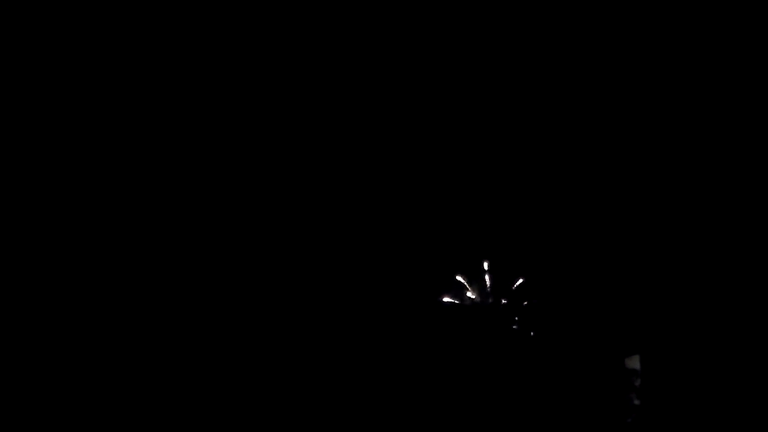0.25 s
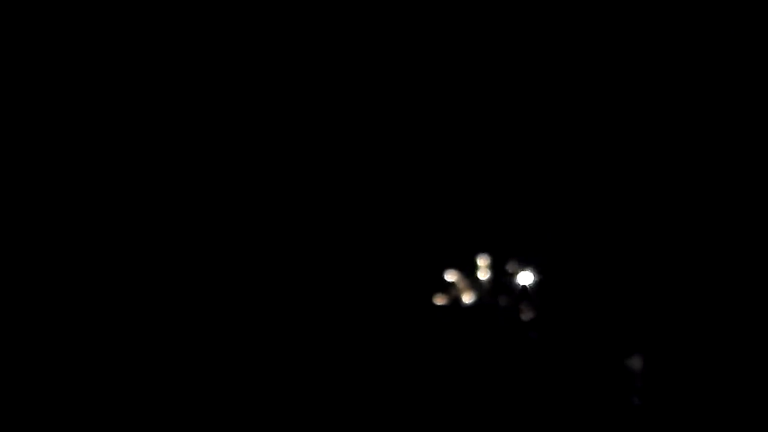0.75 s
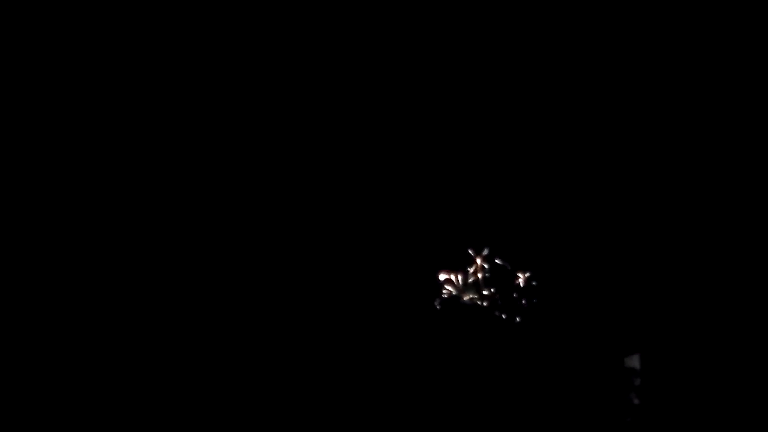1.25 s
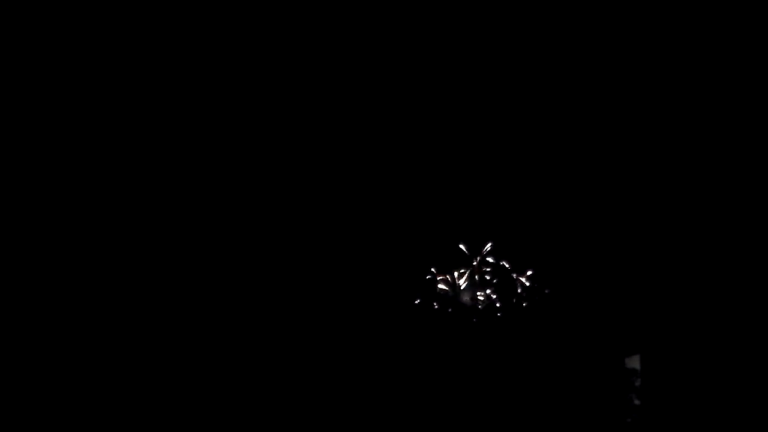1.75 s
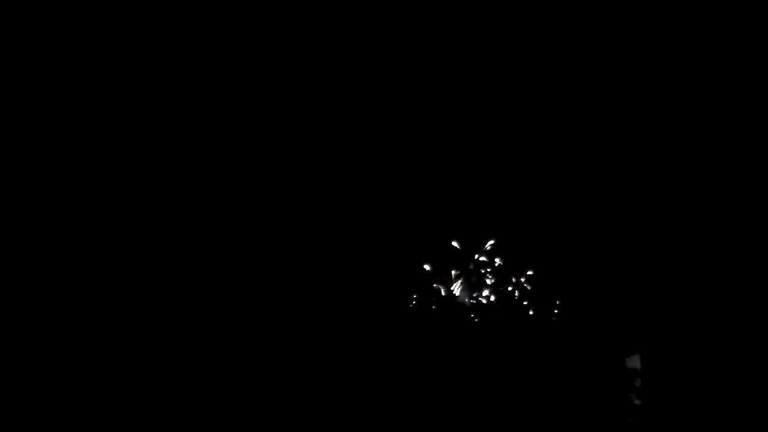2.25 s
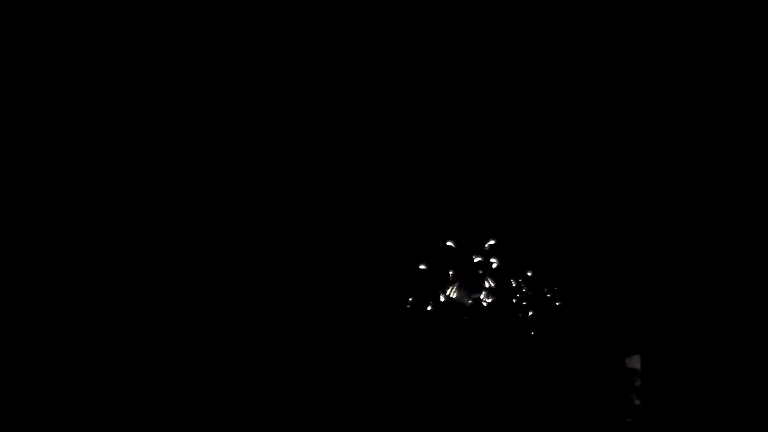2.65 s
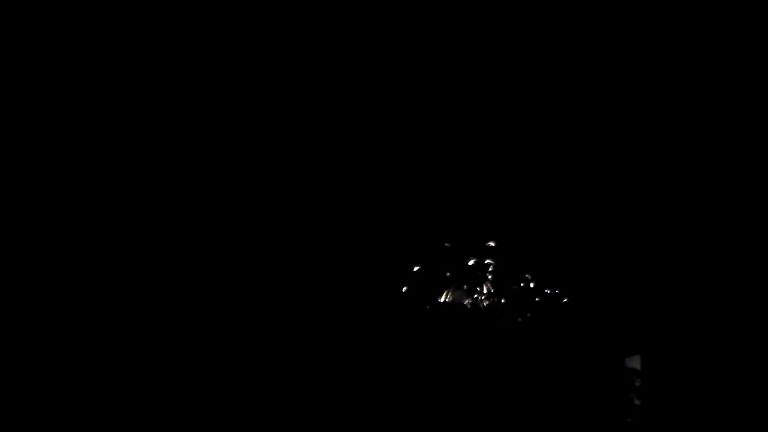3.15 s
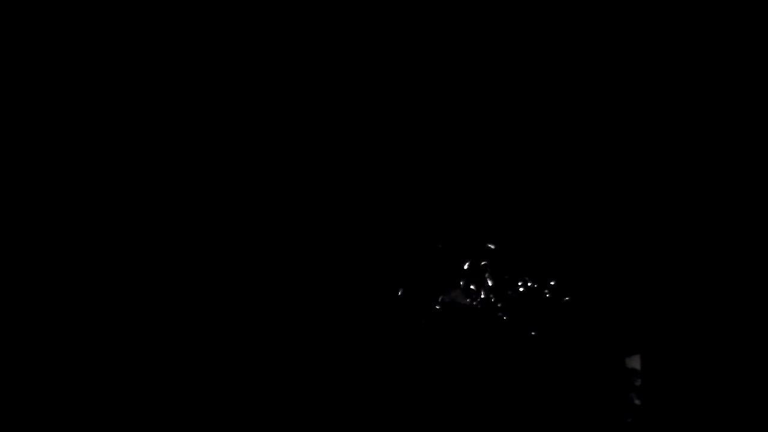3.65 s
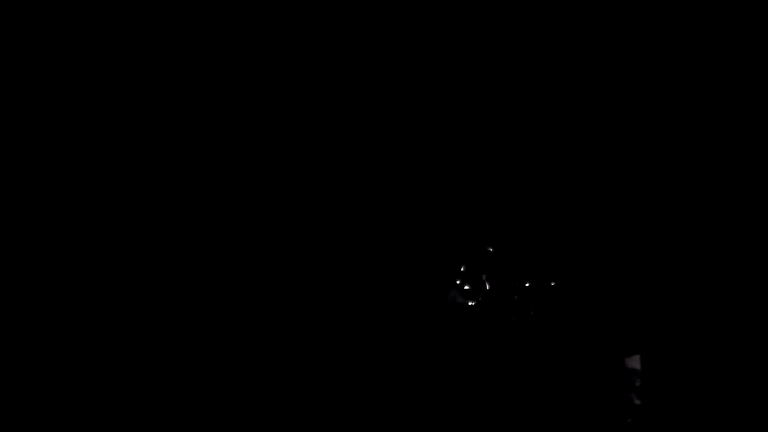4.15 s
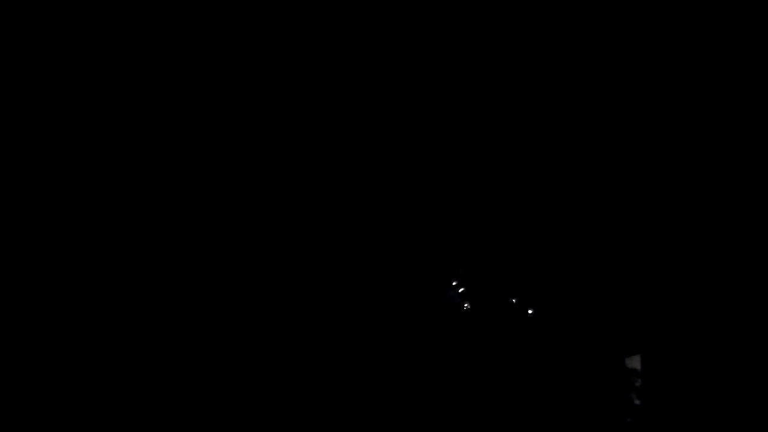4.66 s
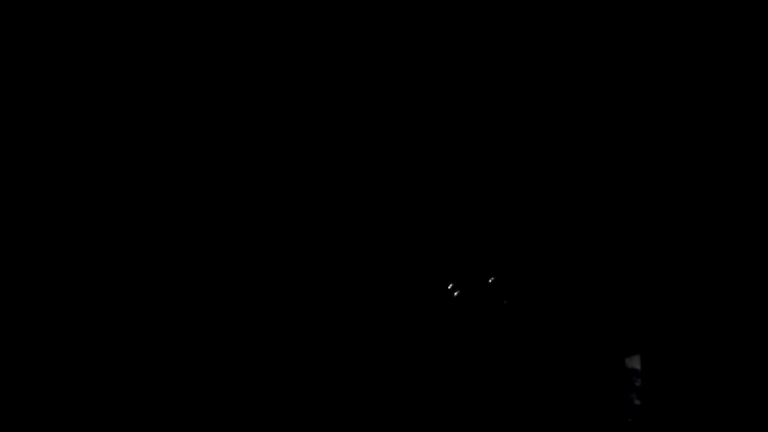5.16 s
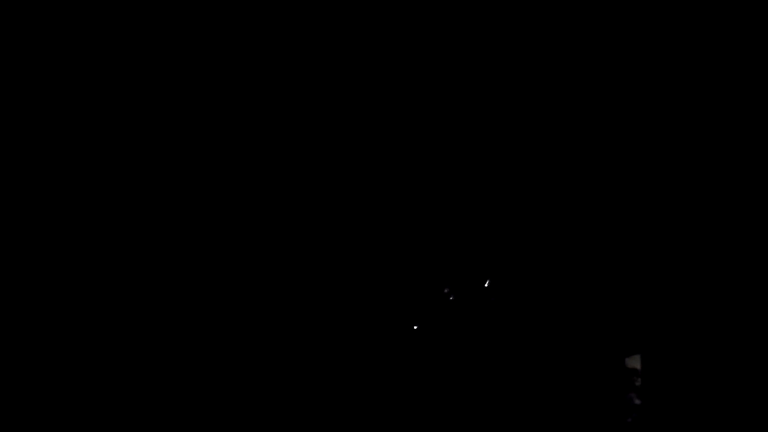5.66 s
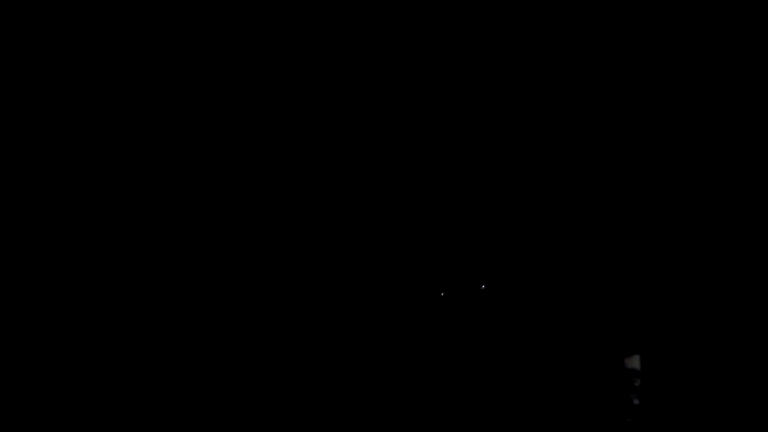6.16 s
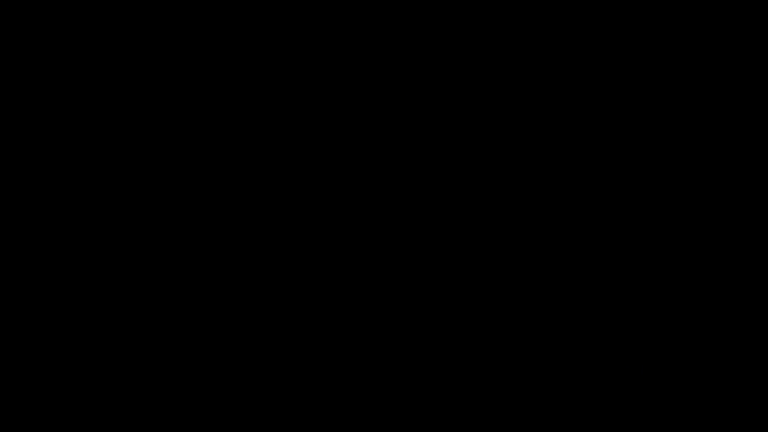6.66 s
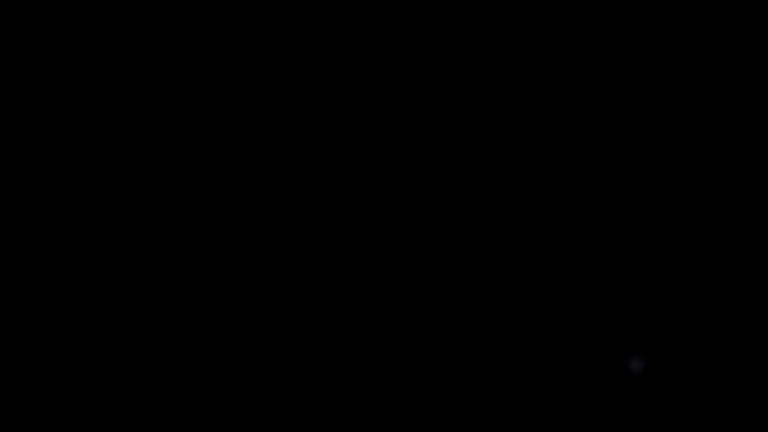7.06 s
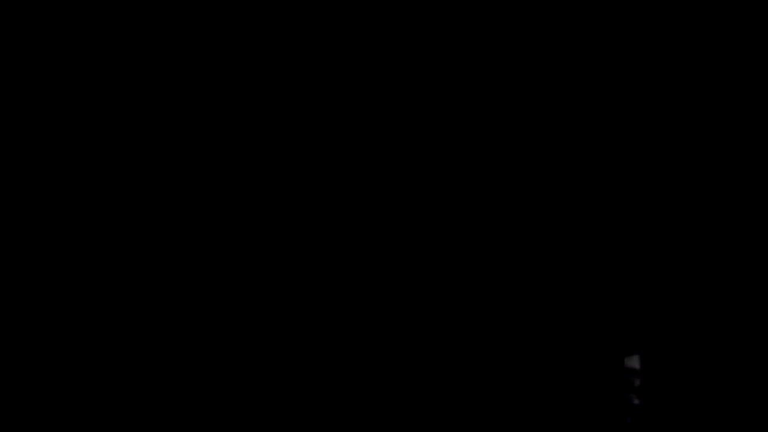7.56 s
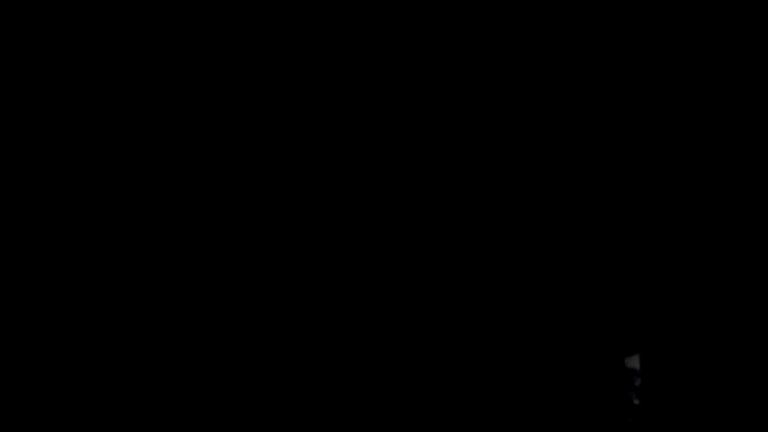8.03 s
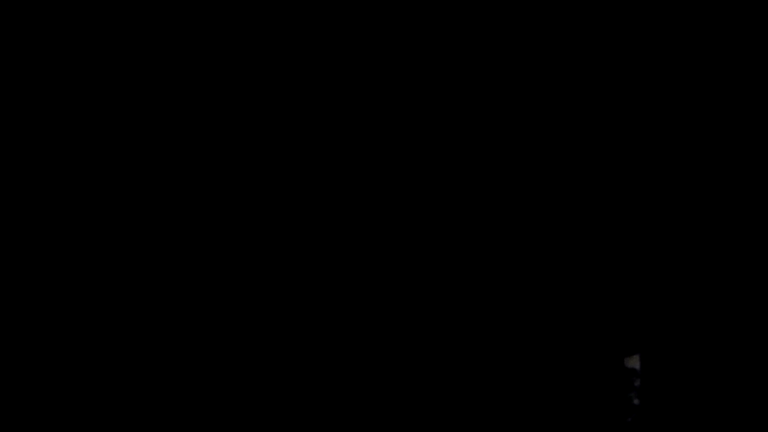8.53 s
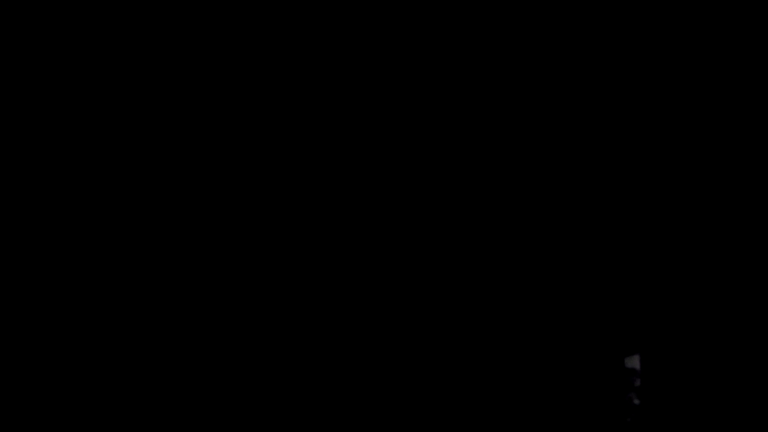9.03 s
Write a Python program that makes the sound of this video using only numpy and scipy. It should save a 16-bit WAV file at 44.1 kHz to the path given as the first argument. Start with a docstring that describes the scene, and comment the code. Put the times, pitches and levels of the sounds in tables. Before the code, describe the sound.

Whooshing rockets and a few sharp, echoing firework bangs give way to dense runs of hollow pops above rumble and faint sizzle.

```python
"""Fireworks heard from a yard: two rockets puff, whoosh up and bang, mortars thump, then a dense run of pops.
Every blast is one pressure pulse thrown back by nearby walls and scatter, with a tail from far houses.
Beneath lie the growing roar and the sizzle of burning effects: shaped noise that follows level curves.
A gain control ducks everything for about half a second after the loudest bangs."""
import sys
import numpy as np
from scipy import signal
from scipy.fft import rfft, irfft, next_fast_len
from scipy.io import wavfile
from scipy.ndimage import uniform_filter1d, minimum_filter1d, map_coordinates

SR = 44100
rng = np.random.default_rng(int(sys.argv[2]) if len(sys.argv) > 2 else 0)


def dump(signal):
    """Clip the signal to [-1, 1] and save it as 16-bit WAV at the path in sys.argv[1]."""
    limited = np.clip(np.atleast_2d(signal).T, -1, 1)
    pcm = np.round(limited * 32767).astype(np.int16)
    wavfile.write(sys.argv[1], SR, pcm)


N = 409688

# shells bursting overhead: t/s, body/dB, ring f/Hz, ring height/dB, thump/dB, crack/dB
BANGS = [(0.4277, -5.5, 710, 17, -21, -39), (1.5114, -10.5, 740, 8, -38, -43),
         (2.6793, -1.5, 1100, 3.5, 0.5, -17), (4.34, -7.5, 1250, -5, 6.5, -27)]
BODY_HZ = 780  # ring at which the body spectrum applies unscaled


def bangs():
    """Shells burst in the open sky, hard and fairly dry."""
    return blasts(BANGS, scatter_db=-3.0, far_db=-20.5, octaves_down=0.244)


def pops():
    """Two volleys of crackers pop, each with a short ring."""
    # crackers: t/s, body/dB, ring f/Hz, thump/dB
    main_crackers = [(4.701, -17, 670, -22.5), (4.8806, -17, 1050, -26), (4.952, -21, 610, -25),
                     (5.0607, -20, 517, -22), (5.1117, -22, 676, -23), (5.2284, -20.5, 720, -30),
                     (5.255, -24.5, 670, -28.5), (5.2663, -23, 563, -21), (5.4061, -25.5, 586, -21),
                     (5.423, -23, 620, -24.5), (5.433, -24.5, 300, -31.5), (5.6374, -25, 290, -23),
                     (5.6753, -22, 500, -29), (5.7195, -25.5, 696, -25), (5.8384, -22.5, 285, -24.5),
                     (5.8998, -26, 760, -35), (6.1711, -25, 620, -28.5), (6.702, -29.5, 1080, -38),
                     (6.7355, -28.5, 640, -31.5), (6.7991, -28, 655, -32), (6.82, -29.5, 1040, -34),
                     (6.8448, -25.5, 1010, -49), (6.859, -24.5, 660, -30), (6.8802, -29, 690, -29.5),
                     (6.9433, -35, 1080, -35), (6.963, -27, 790, -32), (7, -29.5, 1050, -42),
                     (7.027, -28.5, 700, -32), (7.0385, -22.5, 1070, -27.5), (7.0686, -29.5, 1030, -27.5),
                     (7.1003, -23, 680, -36), (7.1652, -22, 704, -34), (7.2775, -24.5, 656, -33),
                     (7.3824, -24.5, 770, -31), (7.4235, -31, 300, -32), (7.783, -27, 910, -32.5),
                     (7.8641, -25.5, 514, -30.5)]
    crack_re_body_db = -44.5
    lesser_crackers = small_pops(start_s=6.74, end_s=7.36, level_db=-37, spread_db=2)
    crackers = np.vstack([main_crackers, lesser_crackers])
    charges = [(s, db, hz, ring_height_db(s, hz), thump_db, db + crack_re_body_db)
               for s, db, hz, thump_db in crackers]
    return blasts(charges, scatter_db=-1.5, far_db=-15)


def small_pops(start_s, end_s, level_db, spread_db, count=24):
    """Lesser crackers, one at random in each equal time slot: rows of t/s, body/dB, ring f/Hz, thump/dB."""
    when, pitch, size, weight = rng.random((count, 4)).T
    body_db = level_db + spread_db * (size - .5)
    times_s = start_s + (end_s - start_s) * (np.arange(count) + when) / count
    ring_hz = BODY_HZ * 2 ** (pitch - .35)
    return np.transpose([times_s, body_db, ring_hz, body_db - 16 * weight])


def ring_height_db(s, hz):
    """The ring stands out more in higher pops, and more in the second volley, which sounds more hollow."""
    second_volley_s = 6.5
    base_db, db_per_octave = (7.5, 1.5) if s < second_volley_s else (14, 8.5)
    return base_db + db_per_octave * np.log2(hz / BODY_HZ)


def mortars():
    """Lift charges in their tubes are nearly all thump."""
    # firings: t/s, thump/dB
    firings = [(0.984, -17), (2.4075, -22.5), (2.4963, -27), (2.985, -20.5), (4.598, -18.5)]
    ring_hz, ring_db = 620, -11  # negative height: a dip
    body_re_thump_db, crack_re_thump_db = -23, -72
    charges = [(s, db + body_re_thump_db, ring_hz, ring_db, db, db + crack_re_thump_db)
               for s, db in firings]
    return blasts(charges, scatter_db=0.0, far_db=-16, octaves_down=0.071)


def snaps(body_re_crack_db=-4, ring_hz=1050, ring_db=6, thump_re_crack_db=-6):
    """Tiny charges, alone or on top of a pop, add a sharp crack with a little body and thump."""
    # snaps: t/s, crack/dB
    cracks = [(1.475, -46), (2.445, -59.5), (4.8806, -63), (5.07, -53), (5.2284, -50), (5.256, -48),
              (5.423, -51), (5.8377, -50), (7.1652, -49), (7.848, -53.5)]
    charges = [(s, db + body_re_crack_db, ring_hz, ring_db, db + thump_re_crack_db, db) for s, db in cracks]
    return blasts(charges, scatter_db=-1, far_db=-21)


def rockets():
    """Two puffs, then a jet whose resonance rises as it climbs; it sags, flares again and dies away."""
    # rockets: launch t/s, puff body/dB, thrust/dB
    launches = [(0.1929, -32.5, -31), (1.279, -22.5, -24)]
    puff_gap_s, puff_hz, puff_step, puff_ring_db = .038, 338, 1.3, 16.5  # second puff higher
    thump_re_body_db, crack_re_body_db = -15, -54
    start_hz, end_hz, climb_tau_s = 429, 687, .04
    attack_s, burn_s, release_s, sag_db_per_s = .04, .21, .035, 85
    flare_delay_s, flare_width_s, flare_db = .185, 0.018, -11  # burning through to the shell
    echo_s, echo_db = 0.17, -16  # far houses return the whoosh
    puffs, whoosh = [], np.zeros((2, N))
    for s, puff_db, thrust_db in launches:
        lit_s = s + puff_gap_s
        for at_s, ring_hz in [(s, puff_hz), (lit_s, puff_hz * puff_step)]:
            puffs.append((at_s, puff_db, ring_hz, puff_ring_db,
                          puff_db + thump_re_body_db, puff_db + crack_re_body_db))
        age_s = np.maximum(np.arange(N) / SR - lit_s, 0)
        resonance_hz = end_hz + (start_hz - end_hz) * np.exp(-age_s / climb_tau_s)
        burn = envelope(lit_s, attack_s, burn_s, release_s, sag_db_per_s)
        flare = amp(flare_db) * swell(lit_s + flare_delay_s, flare_width_s)
        thrust = amp(thrust_db) * (burn + flare)
        whoosh += thrust * jet(resonance_hz, howl_share=0.53, sputter_db=1.9)
    echo = np.pad(whoosh, [(0, 0), (round(echo_s * SR), 0)])[:, :N]
    return blasts(puffs, scatter_db=-2, far_db=-20) + whoosh + amp(echo_db) * echo


def jet(resonance_hz, howl_share, sputter_db):
    """A sputtering jet of rms near 1: broadband noise plus a rough resonance."""
    # jet noise: f/Hz, relative density/dB
    jet_spectrum = [(50, 0), (105, 0), (200, -13.5), (450, -2), (620, 2), (950, -3.5), (1300, -17.5),
                    (1650, -7.5), (2200, -23.5), (2600, -20.5), (3700, -29.5), (4700, -38.5), (9000, -60),
                    (14000, -71)]
    turbulence = wobble(190) + 1j * wobble(190)
    howl = unit(np.real(turbulence * np.exp(2j * np.pi * np.cumsum(resonance_hz) / SR)))
    return amp(sputter_db * wobble(70.07)) * unit(noise(jet_spectrum) + howl_share * howl)


def swishes():
    """A slower, farther jet swells and fades; later a faint high fizz does the same."""
    far_jet = jet(np.full(N, 760.), howl_share=0.53, sputter_db=0.9)
    far_jet = amp(-45.0) * swell(peak_s=2.26, width_s=.21) * far_jet
    fizz = noise([(2500, -25), (3900, 4), (5600, -1), (8000, -18), (14000, -35)])
    return far_jet + amp(-64) * swell(peak_s=7.63, width_s=0.13) * fizz


def whine(start_s=1.0, length_s=.27):
    """A thin, slightly unsteady high tone behind the comet."""
    hz = 6500 + 30 * wobble(150)
    tone = np.sin(2 * np.pi * np.cumsum(hz) / SR)
    return amp(-72) * envelope(start_s, .02, length_s, .01) * tone


def burning():
    """One flame strength drives rumble, roar and rush; comet and rolling echoes add to them; sizzle on top."""
    # noise spectra: f/Hz, relative density/dB
    rumble_spectrum = [(12, -34), (20, -5.5), (38, -1.5), (65, -11), (87, -1), (108, 4), (134, 1.5),
                       (188, -8), (243, -1.5), (290, -22), (330, -8.5), (430, -37), (730, -120)]
    roar_spectrum = [(160, -3.5), (280, 2), (387, -3), (425, -0.5), (710, 1.5), (769, -3.5), (875, -8.5),
                     (920, -9), (1200, -28), (2020, -120)]
    rush_spectrum = [(470, -30), (800, -7.5), (876, 2), (1010, -2), (1070, 5), (1220, -3.5), (1320, -6),
                     (1430, -6), (1500, -4), (1880, -7.5), (2070, -11.5), (2600, -17.5), (3070, -30),
                     (4200, -44), (5460, -88), (9240, -120)]
    sizzle_spectrum = [(1760, -14), (3000, -8.5), (4400, -9), (13600, -12), (14600, -15), (14900, -50),
                       (15400, -54)]
    # flame strength: t/s, level/dB
    flame_points = [(0, -66.5), (.6, -62.5), (1.3, -54), (2, -56), (2.6, -55), (3.1, -49.5), (3.5, -45),
                    (4.2, -46), (4.8, -40), (6.5, -41.5), (8.1, -39.5), (9.29, -41)]
    # sizzle: t/s, level/dB
    sizzle_points = [(0, -69.5), (.7, -63), (1.5, -59.5), (2, -65.5), (4.2, -63.5), (7.1, -64.5),
                     (8.2, -60.5), (9.29, -63.5)]
    full_flame_db = -42
    rumble_db, rumble_db_per_db, roar_db, roar_db_per_db = -43.5, 0.15, -42.5, 0.4  # at full flame; slope
    comet_s, comet_burn_s, comet_edge_s, comet_db = 0.96, 0.327, 0.027, -33
    comet_roar_db, comet_rush_db, roll_roar_db = -7.5, -15, -11  # re their rumble
    roll_db, roll_db_per_db, roll_rise_s, roll_fade_db_per_s = -26.5, 1, 0.021, 20  # at a 0 dB thump

    def together(*gains):
        """Power sum."""
        return np.sqrt(sum(g ** 2 for g in gains))

    (flame_db,), (sizzle_db,) = curves(flame_points), curves(sizzle_points)
    over_db = flame_db - full_flame_db
    comet = amp(comet_db) * envelope(comet_s, comet_edge_s, comet_burn_s, comet_edge_s)
    roll = sum(amp(roll_db + roll_db_per_db * thump_db)
               * envelope(s, roll_rise_s, N / SR, 1, roll_fade_db_per_s)
               for s, _, _, _, thump_db, _ in BANGS)
    sputter = wobble(90)  # shared by roar and rush
    rumble = together(amp(rumble_db + rumble_db_per_db * over_db), comet, roll)
    rumble = rumble * amp(1.3 * wobble(14)) * noise(rumble_spectrum)
    roar = together(amp(roar_db + roar_db_per_db * over_db), amp(comet_roar_db) * comet, amp(roll_roar_db) * roll)
    roar = roar * amp(0.71 * sputter + 0.1 * wobble(3.4)) * noise(roar_spectrum)
    rush = together(amp(flame_db), amp(comet_rush_db) * comet)
    rush = rush * amp(1.43 * sputter + 0.13 * wobble(3.2)) * noise(rush_spectrum)
    return rumble + roar + rush + amp(sizzle_db) * noise(sizzle_spectrum)


def blasts(charges, scatter_db, far_db, octaves_down=0, size=32768):
    """One steep pulse of thump, ringing body and crack per charge, in its own yard response; rows as in BANGS."""
    # pulse parts before shifting: f/Hz, relative level/dB
    thump_spectrum = [(20, -16.5), (45, -11), (65, -19.5), (90, -6.5), (125, -5.5), (175, -10), (235, -8.5),
                      (300, -13.5), (600, -38), (2000, -93)]
    body_spectrum = [(50, -42), (200, -1.5), (420, 2.5), (600, 1), (870, -1.5), (1080, -2.5), (1350, -6),
                     (1800, -6.5), (2400, -16.5), (3100, -26), (5000, -68), (14000, -97)]
    crack_spectrum = [(500, -23), (1200, -10), (1750, 4.5), (2600, 8), (3500, -1), (5000, -5.5), (7300, -7),
                      (9500, -18.5), (14000, -17)]
    out = np.zeros((2, N + size))
    t, hz = np.arange(size) / SR, np.fft.rfftfreq(size, 1 / SR)
    window = .02 * SR  # levels are rms over 20 ms
    for s, body_db, ring_hz, ring_db, thump_db, crack_db in charges:
        place = yard(t, hz, scatter_db, scatter_t60=0.16, far_db=far_db, far_t60=1.34, dull_hz=3450, spread=0.16)
        damping = 1j * hz * ring_hz / 2.8  # Q 2.8
        ring = np.abs(1 + (amp(ring_db) - 1) * damping / (ring_hz ** 2 - hz ** 2 + damping))
        # a higher ring means a shorter pulse, bright all over
        body = ring * amp(along(body_spectrum, hz * (BODY_HZ / ring_hz) ** 0.32))
        # the more the thump dominates, the deeper it is
        lowering = octaves_down + 0.23 * np.tanh((thump_db - body_db) / 6)
        thump = amp(along(thump_spectrum, hz * 2 ** lowering))
        crack = amp(along(crack_spectrum, hz))
        parts = [(thump, thump_db), (body, body_db), (crack, crack_db)]
        power = sum((amp(db) * shape) ** 2 / np.mean(np.abs(shape * place) ** 2) for shape, db in parts)
        pulse = irfft(causal(np.sqrt(power * window)) * place)
        out[:, round(s * SR):][:, :size] -= pulse
    return out[:, :N]


def yard(t, hz, scatter_db, scatter_t60, far_db, far_t60, dull_hz, spread):
    """Stereo response for one spot in the sky: direct sound, walls, scatter from the garden, far houses."""
    # ground and walls, before random variation: delay/ms, signed strength
    reflections = [(.7, -0.31), (2.3, -0.64), (3.5, -0.46), (4.5, .35), (8.9, 0.2), (10.6, -0.99),
                   (17, 0.24)]
    chance = rng.standard_normal((len(reflections), 2))
    walls = 0
    for (ms, strength), (a, b) in zip(reflections, chance):
        delay_s = ms / 10 ** 3 * (1 + .03 * b)
        walls = walls + strength * amp(1.56 * a) * np.exp(-2j * np.pi * hz * delay_s)
    common, apart = rng.standard_normal((2, len(t)))
    diffuse = common + spread * np.array([apart, -apart])
    near = unit(amp(-60 * t / scatter_t60) * (1 - np.exp(-t / 0.00025)))
    far = unit(amp(-60 * t / far_t60) * (1 - np.exp(-t / 0.012)))
    tail = rfft(diffuse * (amp(scatter_db) * near + amp(far_db) * far)) / np.sqrt(len(t))
    # rough surfaces return little treble
    return 1 + walls / (1 + (hz / 1200) ** 2) + tail / (1 + (hz / dull_hz) ** 2)


def causal(magnitude):
    """Minimum-phase spectrum: the most abrupt pulse that has this magnitude."""
    cepstrum = irfft(np.log(np.maximum(magnitude, 1e-6 * magnitude.max())))
    half = len(cepstrum) // 2
    return np.exp(rfft(np.r_[cepstrum[0], 2 * cepstrum[1:half], np.zeros(half)]))


def noise(spectrum):
    """Stereo noise of rms 1: channels alike in the bass, nearly unrelated in the treble."""
    # channel likeness: f/Hz, left-right correlation
    likeness = [(100, 0.99), (1000, 0.98), (2000, 0.91), (3000, 0.52), (5000, 0.033), (9000, 0.031)]

    def mid_side_gains(hz):
        """Spectrum split so that the channels correlate as tabled."""
        turn = np.arccos(np.clip(along(likeness, hz), 0, .999)) / 2
        return amp(along(spectrum, hz)) * [np.cos(turn), np.sin(turn)]

    mid, side = filtered(rng.standard_normal((2, N)), mid_side_gains)
    return unit(np.array([mid + side, mid - side]))


def envelope(start_s, attack_s, length_s, release_s, sag_db_per_s=0):
    """A gain that rises, sags while it lasts and then dies away."""
    t = np.maximum(np.arange(N) / SR - start_s, 0)
    sag = amp(-sag_db_per_s * np.maximum(t - attack_s, 0))
    return np.minimum(t / attack_s, 1) ** 2 * sag * np.exp(-np.maximum(t - length_s, 0) / release_s)


def swell(peak_s, width_s):
    """A bell-shaped gain."""
    return np.exp(-((np.arange(N) / SR - peak_s) / width_s) ** 2)


def wobble(rate):
    """A smooth random curve, rate knots a second."""
    return map_coordinates(rng.standard_normal(int(N * rate / SR) + 4), [np.arange(N) * rate / SR])


def curves(rows):
    """One value per sample for each column after the time."""
    s, *cols = np.transpose(rows)
    return [np.interp(np.arange(N) / SR, s, c) for c in cols]


def along(points, hz):
    """(Hz, value) points read on a log axis."""
    f, v = np.transpose(points)
    return np.interp(np.log(hz + 1), np.log(f + 1), v)


def filtered(x, gain):
    """x times a gain that depends on frequency."""
    m = next_fast_len(N + SR // 2)
    return irfft(rfft(x, m) * gain(np.fft.rfftfreq(m, 1 / SR)), m)[..., :N]


def amp(db):
    """Decibels to gain."""
    return 10 ** (np.asarray(db) / 20)


def unit(x):
    """x at rms 1."""
    return x / np.sqrt(np.mean(x ** 2) + 1e-20)


def scene():
    """All of it at the microphone, the bass a little stronger on the left."""
    # balance: f/Hz, left over right/dB
    left_lead = [(60, 2.5), (250, 0.27), (1000, 0.5), (2000, 0.2), (10000, .1)]
    sky = bangs() + pops() + mortars() + snaps() + rockets() + swishes() + whine() + burning()
    return filtered(sky, lambda hz: amp(along(left_lead, hz) * [[.5], [-.5]]))


def gain_control(x, ceiling_db, firmness, hold_s, release_s):
    """A level over the ceiling pulls the gain down; the gain is held, then creeps back."""
    level = np.abs(uniform_filter1d(np.abs(x).mean(0), size=150, origin=12)) + 1e-9
    needed = np.minimum(1, amp(ceiling_db) / level) ** firmness
    half = int(hold_s * SR / 2)
    held = minimum_filter1d(needed, 2 * half + 1, origin=half, mode="nearest")  # looks back hold_s
    k = np.exp(-1 / (release_s * SR))
    recovering = np.exp(signal.lfilter([1 - k], [1, -k], np.log(held)))
    return x * uniform_filter1d(np.minimum(held, recovering), size=32)


def record(dry):
    """Gain control, a trace of electronic hiss, full-scale clipping and the band limit."""
    top_hz = 14380
    ducked = gain_control(dry, ceiling_db=-18.5, firmness=0.99, hold_s=0.43, release_s=0.067)
    hiss = amp(-68.5) * noise([(100, 2), (3000, 1.5), (8000, -1.7), (14000, -1)])
    return filtered(np.clip(ducked + hiss, -1, 1), lambda hz: hz < top_hz)


dry = scene()
out = record(dry)
dump(out)
```